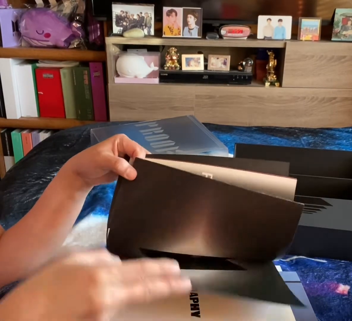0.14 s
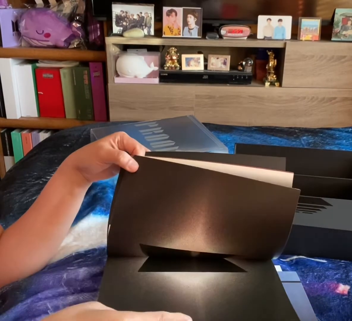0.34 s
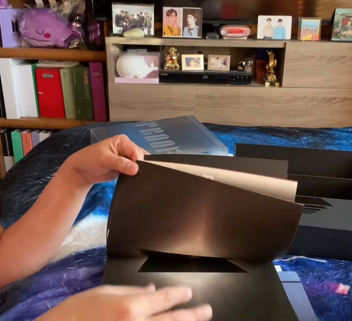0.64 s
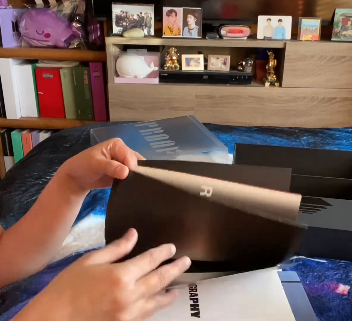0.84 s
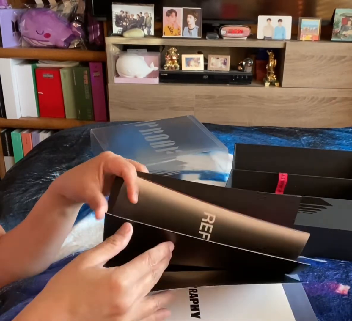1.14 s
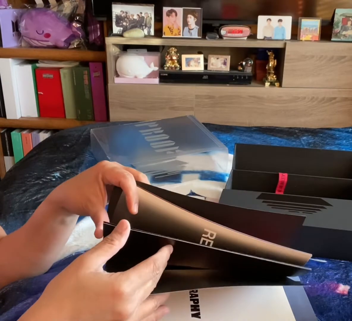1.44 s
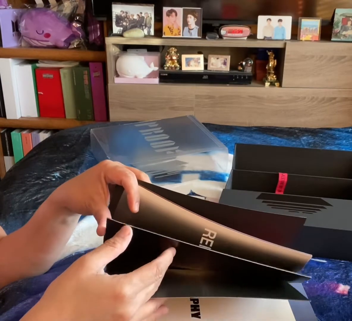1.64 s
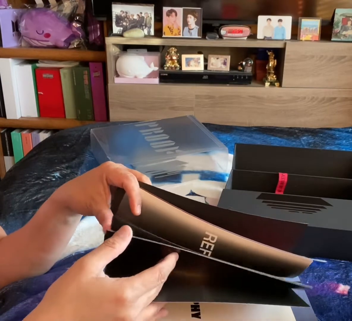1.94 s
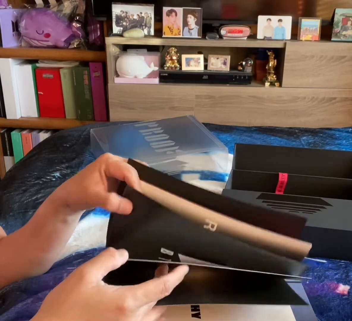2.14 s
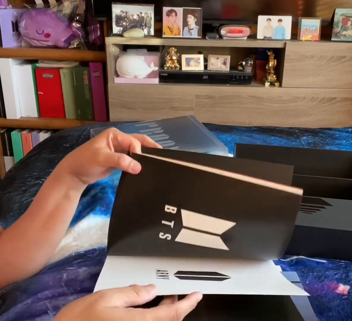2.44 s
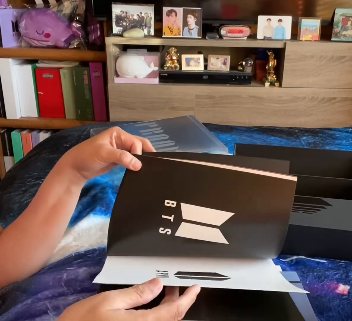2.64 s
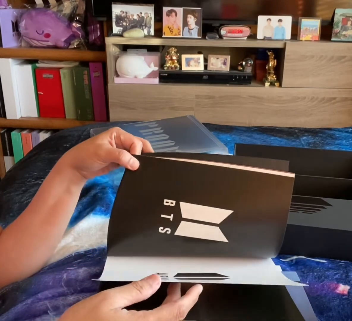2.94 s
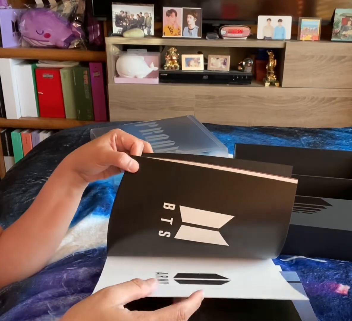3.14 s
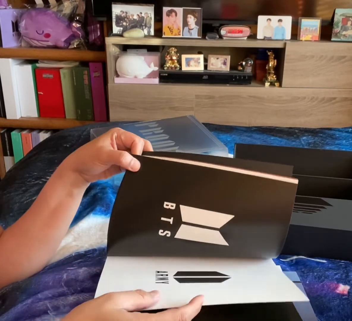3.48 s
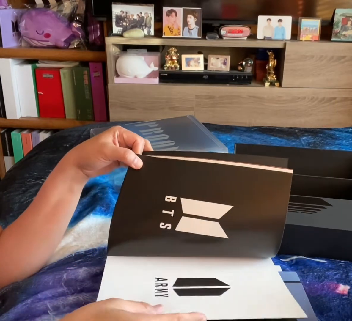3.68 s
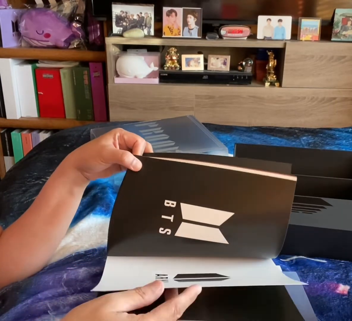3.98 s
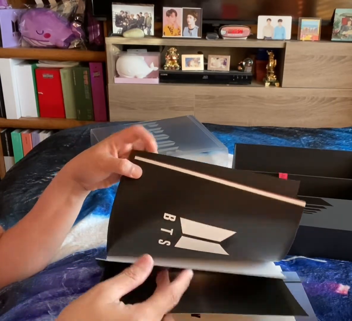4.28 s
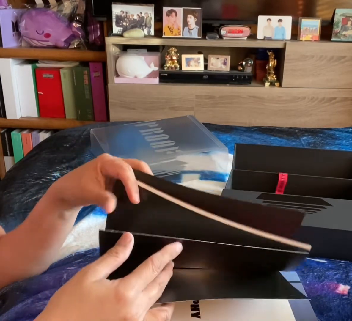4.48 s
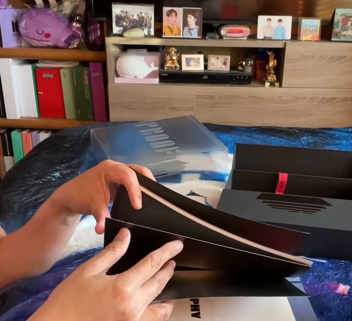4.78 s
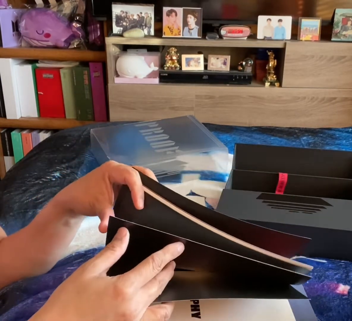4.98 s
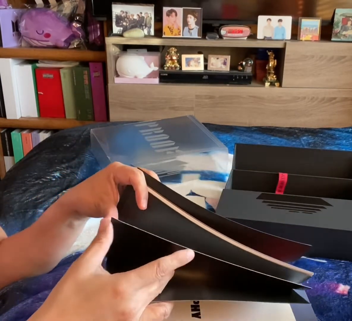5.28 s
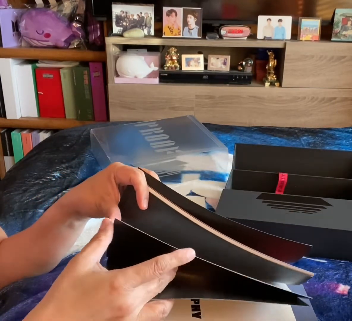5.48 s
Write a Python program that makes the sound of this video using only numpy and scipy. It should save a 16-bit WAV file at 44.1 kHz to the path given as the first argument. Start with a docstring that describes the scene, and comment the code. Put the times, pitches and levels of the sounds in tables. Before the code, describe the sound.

Stiff, coated booklet pages are handled close to the microphone in a small, quiet room with low rumble, faint hum and soft hiss. From 0 s, quick overlapping slides rasp and fizz, with gritty scuffs and short scraping resonances, growing brisker toward 0.9 s. At about 0.92 s a page edge flicks loose: a bright crack, a brief tightening ring, a low flap of air and a broad papery smack, by far the loudest moment. Rubbing continues to 2.7 s, with an extremely thin, broken whistle from 1.2 to 2.1 s. From 2.9 s fingertips tap softly, densest until 3.6 s, dry ticks over dull, padded knocks. A sharp scuff at 4.15 s begins another stretch of sliding until 4.6 s; then mostly faint creeping rustle and weak taps, with short rubs from 5.1 s to the end. A far bird gives faint falling chirps near 0, 2.4, 2.9, 3.3, 3.7, 4.7 and 5.2 s.

```python
"""A small, quiet room with a booklet close to the microphone: hum, hiss, a far bird's chirp.
Stiff pages slide, rub and scuff at once; at 0.9 s a bent sheet flicks loose, rings, flaps and smacks down.
A thin whistle wavers from 1.2 to 2.1 s; from 2.9 s fingertips tap as the rubbing and the chirps go on.
Paper is shaped noise under hand-speed envelopes; the snap, tapped stack, bird and whistle use sines."""
import sys
import numpy as np
from scipy import signal
from scipy.fft import rfft, irfft
from scipy.io import wavfile

SR = 44100
rng = np.random.default_rng(int(sys.argv[2]) if len(sys.argv) > 2 else 0)


def output_pcm(signal):
    """Save a mono or channel-first signal as 16-bit PCM at the path in sys.argv[1].

    Samples are clipped to [-1, 1] before scaling.
    """
    pcm = np.clip(np.atleast_2d(signal).T, -1, 1) * 32767
    wavfile.write(sys.argv[1], SR, np.round(pcm).astype(np.int16))


N = 247842
T, HZ = np.arange(N) / SR, np.fft.rfftfreq(N, 1 / SR)  # time [s], spectrum bins [Hz]


# Close paper: one sheet slides over another. Edge level is before the arch of the stroke:
# (start [s], end [s], edge rasp level [dB], sheet body re rasp [dB], coating fizz re rasp [dB])
SLIDE_STROKES = [(-.03, 0.16, -64.5, 0, -2), (0.146, 0.255, -66, 5, 3), (0.263, 0.403, -68, 6.5, -1),
                 (0.394, 0.558, -75.5, 11.5, 1), (0.508, 0.61, -64.5, -9, 1), (0.606, 0.78, -65.5, -3, -4),
                 (0.751, 0.865, -59, -7.5, -7.5), (0.843, 0.89, -54, -2, 0), (0.93, 1.06, -66.5, 7.5, -0.5),
                 (1.037, 1.122, -57, -1, -4.5), (1.106, 1.257, -67, 3.5, -2.5), (1.337, 1.46, -73, -2, -15),
                 (1.432, 1.579, -63, -4.5, -0.5), (1.59, 1.679, -67, -3.5, -0.5),
                 (1.907, 2.04, -58.5, -2, -3), (2.009, 2.108, -58.5, 4.5, -2), (2.073, 2.285, -62, -2, -4),
                 (2.25, 2.392, -62, 2, -2), (2.37, 2.486, -60.5, 1, -15), (2.497, 2.648, -72, -8, -7),
                 (2.576, 2.74, -71, 4.5, -9.5), (2.862, 3.087, -72, -4, -14.5),
                 (3.078, 3.21, -68.5, 2, -1.5), (3.43, 3.57, -71, 1, 2.5), (3.687, 3.932, -73, -19, -5.5),
                 (3.937, 4.093, -64, 0, -8.5), (4.068, 4.173, -58.5, -0.5, 1.5),
                 (4.172, 4.484, -60.5, -3.5, -8.5), (4.433, 4.613, -66.5, -6, -4.5),
                 (5.139, 5.235, -69, -1, -9), (5.188, 5.31, -63, -4, -5), (5.31, 5.396, -69, 0.5, -26),
                 (5.409, 5.569, -66.5, 0, -28)]
# Rustle of the hands on the binding: (time [s], level [dB])
HAND_LEVELS = [(0, -82), (.5, -81), (1.2, -69.5), (1.8, -74.5), (2.45, -65.5), (3.0, -71), (4.0, -69.5),
               (5.1, -70.5), (5.62, -69)]
# Colour of the sheet body: (frequency [Hz], level [dB])
SHEET_COLOUR = [(200, -20.5), (400, -3), (700, -1), (1000, 1.5), (1300, -3), (1750, -3), (2300, -9.5),
                (3500, -19), (7000, -55.5)]
# Colour of the rasping edge: (frequency [Hz], level [dB])
RASP_COLOUR = [(800, -25), (1700, -3), (2400, 2.5), (3500, 1.5), (4700, -2), (6000, -8.5), (8000, -8.5),
               (12000, -35)]
# Colour of the fizzing coating: (frequency [Hz], level [dB])
FIZZ_COLOUR = [(3000, -25.5), (5500, -2.5), (7500, -0.5), (9500, -1), (12000, -3.5), (13600, -4.5),
               (14800, -26), (16500, -30.5)]
# The hands keep the held sheets creeping: body re hand level [dB], edge level [dB]
CREEP_BODY_DB, CREEP_RASP_DB = -5, -84
# Fingers creep on the binding in fits and starts: depth [dB], rate [Hz]
FIDGET_DB, FIDGET_HZ = 2.5, 16
JUDDER_DB = 1.0  # how hard the uneven pull shakes the layers
CRACKLE_DB = -7.5  # snapping fibres against the rasp


def slide():
    """Fibres catch and let go as sheet slides on sheet; the uneven pull shakes all layers together."""
    power = 0
    for start, end, db, body, fizz_db in SLIDE_STROKES:
        layer_gains = amp([db + body, db, db + fizz_db])
        power = power + np.outer(layer_gains, stroke(start, end)) ** 2
    sheet_gain, rasp_gain, fizz_gain = np.sqrt(power)
    grip = amp(np.interp(T, *np.transpose(HAND_LEVELS)))

    creeping_sheet = np.hypot(sheet_gain, grip * amp(CREEP_BODY_DB))
    sheet = creeping_sheet * noise(SHEET_COLOUR, grain_db=2) * amp(1.0 * wander(60))
    rasp = np.hypot(rasp_gain, amp(CREEP_RASP_DB)) * noise(RASP_COLOUR, grain_db=2.5)
    rasp = rasp + rasp_gain * amp(CRACKLE_DB) * crackle()
    fizz = fizz_gain * noise(FIZZ_COLOUR, grain_db=1.5)

    hand_colour = [(120, -9.5), (220, -1.5), (420, 1.5), (700, 0.5), (1400, -12.5), (4000, -58.5)]  # Hz, dB
    hands = grip * noise(hand_colour, grain_db=3.0)
    fidget = unit(amp(FIDGET_DB * wander(FIDGET_HZ)))
    judder = amp(JUDDER_DB * wander(200))
    return flexing((sheet + rasp + fizz) * judder + hands * fidget)


ATTACK_S, RELEASE_S, ARCH_DB = 0.048, 0.024, 2.0


def stroke(start, end):
    """Speed of one slide: a smooth start, an arch while the hand pulls, a short run-out."""
    along = np.clip((T - start) / (end - start), 0, 1)
    attack = np.sin(np.pi / 2 * np.clip((T - start) / ATTACK_S, 0, 1)) ** 2
    release = np.exp(-np.clip((T - end) / RELEASE_S, 0, 60))
    arch = amp(ARCH_DB * (np.sin(np.pi * along) - 1.5))  # 1 dB down in the middle, 3 dB at the ends
    return attack * release * arch


# Colour of single fibres snapping under the sliding edge: (frequency [Hz], level [dB])
CRACKLE_COLOUR = [(400, -14.5), (1200, 2.5), (3000, 5), (6000, -1), (8500, -10.5), (13000, -14.5),
                  (15000, -39.5)]
CRACKLE_PER_S = 190  # mean number of clicks a second


def crackle(spread_db=5.0):
    """Snapping fibres give sparse tiny clicks of uneven size."""
    sign = rng.choice([-1., 1.], (2, N))
    hit = rng.random(N) < CRACKLE_PER_S / SR
    size = amp(spread_db * np.minimum(rng.exponential(1, N), 3))
    return unit(irfft(rfft(sign * hit * size) * amp(read(CRACKLE_COLOUR)), N))


FLEX_DB = 3.2  # how far the colour of a bending sheet shifts


def flexing(pair, across_hz=130, lasting=0.024):
    """The resonances of a bending sheet come and go, so its colour keeps shifting."""
    z = signal.stft(pair, nperseg=512, noverlap=384)[2]
    bins, frames = z.shape[1:]
    over_hz = np.exp(-(np.arange(-12, 13) * SR / 512 / across_hz) ** 2)
    over_time = np.exp(-(np.arange(-40, 41) * 128 / SR / lasting) ** 2)
    chance = rng.standard_normal((bins, frames))
    patches = unit(signal.fftconvolve(chance, np.outer(over_hz, over_time), "same"))
    return signal.istft(z * unit(amp(FLEX_DB * patches)), nperseg=512, noverlap=384)[1][:, :N]


# Close paper: a dragged edge makes one patch of the sheet ring:
# (time [s], level [dB], pitch [Hz], swell [s])
SCRAPE_EVENTS = [(.125, -56.5, 1710, 0.027), (.19, -61, 1200, .02), (.2, -64, 1900, .025),
                 (.25, -62, 1124, 0.026), (.32, -65, 1130, 0.044), (.33, -69, 2050, .03),
                 (.35, -74, 6560, 0.029), (.392, -66, 1760, 0.023), (.48, -64, 1060, .04),
                 (.55, -61, 950, 0.047), (.56, -64, 1200, 0.023), (.72, -67.5, 12100, .05),
                 (.733, -56.5, 3440, 0.016), (.735, -58, 1740, 0.014), (.833, -60, 1320, 0.046),
                 (.893, -56.5, 1744, .023), (1.075, -56, 1210, 0.023), (1.1, -61.5, 1850, .04),
                 (1.535, -65, 6500, 0.017), (1.944, -64, 1208, 0.024), (1.985, -60, 1210, 0.025),
                 (2.033, -57, 4500, 0.013), (2.058, -56.5, 1190, .018), (2.21, -61.5, 2140, .03),
                 (2.33, -63, 7400, .023), (2.33, -56, 960, 0.018), (2.437, -59, 3460, 0.023),
                 (2.46, -58, 1020, 0.042), (2.63, -66.5, 6470, 0.021), (2.69, -69.5, 6500, .023),
                 (3.16, -70, 12400, 0.017), (3.99, -65.5, 2750, 0.042), (4.125, -61, 6060, .023),
                 (4.16, -54.5, 1080, .02), (4.16, -58, 2950, .015), (4.228, -60.5, 3120, 0.051),
                 (4.29, -63, 4400, .04), (4.335, -66, 3250, .04), (4.35, -66, 1260, 0.036),
                 (4.385, -60, 2710, 0.053), (4.445, -65.5, 3920, .03), (5.225, -66, 3300, 0.027),
                 (5.28, -70.5, 6500, 0.029), (5.453, -58.5, 1425, .012), (5.535, -66.5, 3700, .04)]
SCRAPE_FADE = 0.5  # fade time as a share of the swell


def scrapes(width=0.1):
    """Friction noise in one narrow resonance, whose width is a share of its pitch."""
    drive = rfft(rng.standard_normal((2, N)))
    out = 0
    for s, db, hz, swell in SCRAPE_EVENTS:
        resonance = 1 + ((HZ / hz - 1) / width) ** 2
        ring = unit(irfft(drive / resonance, N))
        out = out + amp(db) * burst(s, swell, SCRAPE_FADE * swell) * ring
    return out


# Close paper: a page edge catches and slips: (time [s], level [dB], fade [s], brightness [dB/octave])
SCUFF_EVENTS = [(.114, -54.5, 0.023, 1), (0.245, -55, 0.0051, -3.5), (0.542, -58, 0.038, -5.5),
                (0.733, -57.5, 0.014, -1), (.889, -51.5, 0.034, -2), (1.542, -54, 0.0081, 0),
                (2.064, -54, 0.014, 2.5), (2.084, -54, .002, 0), (2.352, -58, 0.038, 5),
                (2.463, -57, 0.007, 0), (3.106, -55, 0.0081, 5), (4.147, -53.5, 0.0038, 7),
                (4.158, -44.5, 0.006, 4.5), (4.304, -57, 0.021, 5.5), (5.32, -57.5, 0.0028, 4),
                (5.444, -53.5, 0.017, 2)]
# Colour of a scuff, shared by the fingertip ticks and the landing: (frequency [Hz], level [dB])
SCUFF_COLOUR = [(150, -11), (500, 2.5), (1300, 2), (2200, -1), (4000, -3), (7000, -8.5), (10000, -20),
                (13000, -20), (16000, -34)]
SCUFF_RISE_S = 0.0025


def scuffs():
    """Short gritty slips of a page edge, each a burst of shaped noise."""
    out = 0
    for s, db, fade, tilt in SCUFF_EVENTS:
        out = out + amp(db) * burst(s, SCUFF_RISE_S, fade) * noise(SCUFF_COLOUR, tilt_db=tilt)
    return out


# Close fingertips on the booklet: (time [s], tick level [dB], dull knock level [dB])
TAP_EVENTS = [(2.876, -62, -57), (2.9011, -56.5, -52.5), (2.9593, -53, -51), (3.066, -60, -54.5),
              (3.099, -51, -50), (3.107, -56.5, -57), (3.187, -54, -54), (3.359, -65, -53.5),
              (3.392, -73, -59), (3.428, -61.5, -56), (3.511, -59, -55.5), (3.632, -74, -64),
              (3.881, -67.5, -55), (3.91, -65, -53.5), (4.134, -61, -54), (4.294, -60, -60),
              (4.456, -64, -57.5), (4.506, -66, -63), (4.538, -68, -56), (4.744, -76.5, -62.5),
              (4.775, -76, -61.5), (4.9, -73, -59.5), (5.084, -77.5, -64), (5.107, -74, -61.5),
              (5.192, -68, -58.5)]
# Colour of the padded thud: (frequency [Hz], level [dB])
THUD_COLOUR = [(50, -38.5), (110, -10), (220, 6), (400, 6), (720, 5.5), (1200, -4.5), (2500, -16),
               (5000, -31), (9000, -39)]
# Ring of the stack of pages, before detuning: (pitch [Hz], level re knock [dB], fade [s])
STACK_RING = [(182, -6, 0.015), (297, -6.5, 0.0042), (413, -9, 0.019), (570, -8.5, 0.0095),
              (740, -4.5, 0.01), (1000, -11.5, 0.00092)]


def taps(tick_tilt_db=0.5, thud_db=-1, thud_fade=0.0024, shuffle_db=-15, shuffle_fade=0.016):
    """A tap is a dry tick, a padded thud and the stack's ring, whose loose sheets shuffle briefly."""
    tick, thud = 0, 0
    for s, tick_db, knock_db in TAP_EVENTS:
        tick = tick + amp(tick_db) * burst(s, 0.00048, 0.0013)
        thud = thud + amp(knock_db + thud_db) * burst(s + 0.00032, 0.0008, thud_fade)
        thud = thud + amp(knock_db + shuffle_db) * burst(s + 0.0026, 0.002, shuffle_fade)

    knock, t = np.zeros(N), T[:SR // 8]
    # each tap falls on its own spot: chance polarity and detuning of every mode
    spots_of_taps = rng.uniform(-1, 1, (len(TAP_EVENTS), len(STACK_RING), 2))
    for (s, _, knock_db), spots in zip(TAP_EVENTS, spots_of_taps):
        ring = 0
        for (hz, level, fade), (side, detune) in zip(STACK_RING, spots):
            tone = np.sin(2 * np.pi * hz * (1 + 0.072 * detune) * t)
            ring = ring + np.sign(side) * amp(level) * np.exp(-t / fade) * tone
        knock[round(s * SR):][:len(t)] += amp(knock_db) * ring
    return tick * noise(SCUFF_COLOUR, tilt_db=tick_tilt_db) + thud * noise(THUD_COLOUR) + knock


# Colour of the page edge flicking off the finger: (frequency [Hz], level [dB])
CRACK_COLOUR = [(500, -1), (2200, -2), (3000, -3.5), (4800, -6), (5600, -8.5), (6800, -4), (7350, 3),
                (7650, 9), (8100, 1.5), (9000, -5), (11000, -10.5), (13000, -6.5), (14200, -20),
                (16500, -27)]
# Start [s], level [dB], hold [s], fade [s]
CRACK_S, CRACK_DB, CRACK_HOLD_S, CRACK_FADE_S = 0.9168, -28, 0.0018, 0.0013


def crack(tail_db=-21, tail_fade=0.024):
    """The page edge flicks off the finger just before the buckling; a thin sizzle trails it."""
    hold = (T > CRACK_S) * np.exp(-np.clip((T - CRACK_S - CRACK_HOLD_S) / CRACK_FADE_S, 0, 60))
    flick = np.maximum(burst(CRACK_S, 0.0004, CRACK_FADE_S), hold)
    sizzle = amp(tail_db) * burst(CRACK_S, 0.0004, tail_fade)
    return amp(CRACK_DB) * (flick + sizzle) * noise(CRACK_COLOUR)


# Ring of the flipping sheet, before the climb and the left/right trims: (pitch [Hz], level [dB])
SNAP_RING = [(195, -36), (345, -38), (600, -35.5), (790, -35.5), (1030, -26), (1175, -17.5), (1345, -26),
             (1455, -26), (1590, -26), (1665, -26.5), (1985, -36.5)]
# The belly flaps and pushes air, before the left/right trims:
# (middle time [s], peak level [dB], pitch [Hz], length [s])
BELLY_FLAPS = [(0.9371, -37, 334, 0.011), (.938, -40, 73.8, 0.063), (0.949, -28.5, 210, .012),
               (.957, -42.5, 180, .016)]
# The bent sheet snaps through: start, swell, hold, decay [s]
SNAP_S, SNAP_ATTACK_S, SNAP_HOLD_S, SNAP_FADE_S = 0.9177, 0.0016, 0.008, 0.003
SNAP_CLIMB_PER_S = 3  # the ring climbs as the sheet pulls taut: share of the pitch per second


def buckle():
    """The sheet flips through its bend, ringing briefly as it tightens, and its belly flaps."""
    age = T - SNAP_S
    swell = np.clip(age / SNAP_ATTACK_S, 0, 1)
    decay = np.exp(-np.clip((age - SNAP_ATTACK_S - SNAP_HOLD_S) / SNAP_FADE_S, 0, 60))
    # bent time axis: the listed pitches are reached one hold time after the start
    taut = age * (1 + SNAP_CLIMB_PER_S * (age / 2 - SNAP_HOLD_S))
    out = swell * decay * sum(amp(db) * np.sin(2 * np.pi * hz * taut) for hz, db in SNAP_RING)
    for s, db, hz, length in BELLY_FLAPS:
        near = abs(T - s) < length / 2
        t = T[near] - s
        out[near] += amp(db) * np.cos(np.pi * t / length) ** 2 * np.cos(2 * np.pi * hz * t)
    late = np.interp(T - 0.00005, T, out)  # the left side comes 0.05 ms later
    return np.array([late * amp(-2.0), out * amp(-2.4)])


# Broad papery colour of the sheet slapping onto the page below: (frequency [Hz], level [dB])
SMACK_COLOUR = [(120, -12.5), (300, -8), (480, -13), (750, -9), (1150, 3.5), (1620, 0), (2250, -8.5),
                (2750, -23.5), (5000, -28.5), (12000, -40)]


def smack(settle_db=-51, settle_fade=0.02):
    """Broad noise of the whole sheet as it flips over; it shivers roughly as it settles."""
    shiver = amp(settle_db) * burst(0.93, 0.012, settle_fade) * unit(amp(3.8 * wander(110)))
    slap = amp(-31) * burst(0.933, 0.0075, 0.016)
    return slap * noise(SMACK_COLOUR) + shiver * noise(SMACK_COLOUR, grain_db=4.0, tilt_db=0.5)


def landing(s=0.9405, db=-41.5, tilt_db=-4.0):
    """The flipped sheet skids to rest on the page below, a gritty burst of noise."""
    return amp(db) * burst(s, 0.0045, 0.014) * noise(SCUFF_COLOUR, tilt_db=tilt_db)


# Level of the thin whistle, before a 4 dB lift: (time [s], level [dB])
WHINE_LEVELS = [(1.18, -90), (1.27, -81), (1.35, -78), (1.375, -84), (1.41, -77), (1.46, -85), (1.51, -80),
                (1.62, -81), (1.675, -72), (1.735, -86), (1.785, -77), (1.825, -82), (1.86, -78),
                (1.895, -86), (1.94, -72), (2.05, -73), (2.12, -110)]
# Its partials: (pitch [Hz], relative level [dB])
WHINE_TONES = [(1990, -11), (2308, 0), (2620, -12)]
# Its pitch drifts slowly and trembles [Hz rms each]
WHINE_DRIFT_HZ, WHINE_TREMBLE_HZ = 12, 6


def whine(flutter_db=2):
    """A thin, faint whistle of sines that wavers and breaks up while the pages are held up."""
    drift = WHINE_DRIFT_HZ * wander(9)
    level = np.interp(T, *np.transpose(WHINE_LEVELS), left=-np.inf, right=-np.inf)
    tone = 0
    for hz, db in WHINE_TONES:
        gain = amp(level + db + flutter_db * np.tanh(wander(22)))
        pitch = hz + drift + WHINE_TREMBLE_HZ * wander(58)
        tone = tone + gain * np.sin(2 * np.pi * np.cumsum(pitch) / SR)
    return amp(4.0) * tone + amp(-5) * room(np.array([tone, tone]))


# A far bird, before pitch blur and mixing trims:
# (time [s], level [dB], first pitch [Hz], last pitch [Hz], length [s])
BIRD_CHIRPS = [(0.029, -60.5, 4580, 4090, 0.076), (2.372, -63.5, 4570, 3160, 0.083),
               (2.865, -71, 4850, 3550, 0.077), (3.297, -63.5, 4580, 3004, 0.073),
               (3.697, -62, 4610, 2940, 0.1), (4.699, -70.5, 4795, 3410, 0.084),
               (5.162, -68.5, 4580, 3146, 0.08)]
# The call comes back from the walls outside: (delay [s], level re call [dB])
WALL_ECHOES = [(.024, -9), (.047, -10), (.078, -13)]


def chirps(blur_hz=230, rough_db=2.0, bend=1.4):
    """Broken whistles that fall in pitch and flatten out, trailed by echoes."""
    out = np.zeros((2, N))
    for side in out:
        waver = blur_hz * wander(560)
        for s, db, top_hz, end_hz, length in BIRD_CHIRPS:
            on = (T > s) & (T < s + length)
            u = (T[on] - s) / length
            pitch = end_hz + (top_hz - end_hz) * (1 - u) ** bend + waver[on]
            turns = np.cumsum(pitch) / SR
            side[on] += amp(db) * np.sqrt(np.sin(np.pi * u).clip(0)) * np.sin(2 * np.pi * turns)
    out = out * unit(amp(rough_db * wander(90)))
    return out + echoes(out, WALL_ECHOES)


# Colour of the low room rumble: (frequency [Hz], level [dB])
RUMBLE_COLOUR = [(20, -30.5), (35, -10), (58, 0.5), (80, 1), (108, 5.5), (128, 2), (155, -11.5),
                 (195, -13.5), (230, -14.5), (265, -17), (320, -25), (400, -24.5), (480, -23), (800, -64.5)]
# Faint wavering hum tones: (pitch [Hz], level [dB])
HUM_TONES = [(107, -66), (192, -73), (260, -79.5), (398, -81)]
# Colour of the soft hiss: (frequency [Hz], level [dB])
HISS_COLOUR = [(150, -12), (400, 9.5), (700, -4), (1200, -4), (2400, -3), (4000, -17.5), (6000, -16.5),
               (9000, -30), (13000, -14.5), (16000, -43)]
# Likeness of left and right in the room sound: (frequency [Hz], likeness [0-1])
ROOM_LIKENESS = [(50, 1), (200, 0.62), (500, 0), (1500, 0.1), (8000, .3)]


def background(width_hz=9, rumble_db=-57.0, swell_db=0.3, hiss_db=-77.5):
    """Low lumpy rumble and wavering hum tones of narrow noise under a soft hiss."""
    swell = unit(amp(swell_db * wander(14)))
    drive = rfft(rng.standard_normal((2, N)))
    tones = 0
    for hz, db in HUM_TONES:
        tones = tones + amp(db) * unit(irfft(drive * np.exp(-((HZ - hz) / width_hz) ** 2), N))
    rumble = amp(rumble_db) * noise(RUMBLE_COLOUR) * swell
    hiss = amp(hiss_db) * noise(HISS_COLOUR)
    return left_right(rumble + tones + hiss, ROOM_LIKENESS)


# Decay of the small room: (frequency [Hz], time to fall 60 dB [s])
ROOM_DECAY = [(150, 0.24), (500, 0.21), (1300, 0.14), (3000, 0.19), (8000, 0.076), (15000, 0.14)]


def room(x, first=0.015):
    """Sparse reflections of random sign, each band dying at its own speed."""
    size = SR // 2
    sign = rng.choice([-1., 1.], (2, size))
    reflections = sign * (rng.random((2, size)) < 0.06) * (T[:size] > first)
    hz, t, z = signal.stft(reflections, SR, nperseg=256)
    decay = amp(-60 * t / read(ROOM_DECAY, hz)[:, None])
    tail = signal.istft(z * decay, SR, nperseg=256)[1]
    tail = tail / np.linalg.norm(tail, axis=1, keepdims=True)
    return signal.fftconvolve(x, tail, axes=1)[:, :N]


def echoes(x, table):
    """Single delayed copies of a sound, as from separate surfaces."""
    out = 0
    for delay, db in table:
        out = out + amp(db) * np.pad(x, ((0, 0), (round(delay * SR), 0)))[:, :N]
    return out


def left_right(pair, likeness, phase=0):
    """Spreads two unrelated signals over left and right, by likeness and phase in each band."""
    a, b = rfft(pair)
    same = np.clip(read(likeness), 0, 1)
    right = same * a + np.sqrt(1 - same ** 2) * b
    return irfft([a, right * np.exp(-1j * phase)], N)


def amp(db):
    """Decibels to gain."""
    return 10 ** (np.asarray(db) / 20)


def unit(x):
    """Scales to rms 1."""
    return x / np.sqrt(np.mean(x ** 2) + 1e-20)


def read(points, hz=HZ):
    """Reads a table on a log-frequency axis."""
    f, value = np.transpose(points)
    return np.interp(np.log(hz + 1), np.log(f + 1), value)


def noise(spectrum, grain_db=0, tilt_db=0):
    """Two unrelated coloured noises; uneven sample sizes make them gritty."""
    grain = amp(grain_db * np.minimum(rng.exponential(1, N), 6))
    drive = rng.standard_normal((2, N)) * grain
    colour = amp(read(spectrum) + tilt_db * np.log2(HZ / 3000 + 0.0194))  # tilt in dB/octave
    return unit(irfft(rfft(drive) * colour, N))


def wander(rate_hz):
    """Slow chance of rms 1, up to about the given rate."""
    return unit(irfft(rfft(rng.standard_normal(N)) * np.exp(-(HZ / rate_hz) ** 2), N))


def burst(s, rise, fade):
    """Envelope that swells up to the time s and dies away."""
    return np.exp(-np.minimum(np.where(T < s, ((T - s) / rise) ** 2, (T - s) / fade), 60))


# Likeness of left and right in the close paper: (frequency [Hz], likeness [0-1])
PAPER_LIKENESS = [(100, 0.92), (500, 0.8), (1400, 0.9), (2300, .7), (3300, 0.1), (6000, 0.3), (7700, 0.2),
                  (8600, 1), (15000, 0.99)]
# Phase between left and right of the close paper: (frequency [Hz], phase [radians])
PAPER_PHASE = [(100, 2), (700, -2.5), (1600, -0.86), (2500, -1.77), (4400, -1.7), (5300, -0.5), (6200, 2.5),
               (7400, 3), (8600, 2), (9500, 3), (11300, 6.5), (12900, 8), (14200, 7.5)]
# The snap comes back from nearby furniture: (delay [s], level re snap [dB])
FURNITURE_ECHOES = [(0.0131, -19.5), (0.0313, -20.5)]


def scene():
    """Near paper, the snap, the distant bird and the room around them."""
    rubbing = slide() + scrapes() + scuffs() + taps() + crack() + landing()
    paper = left_right(rubbing + amp(-9.0) * room(rubbing), PAPER_LIKENESS, read(PAPER_PHASE))
    snap, slap, call = buckle(), smack(), chirps()
    snap_in_room = room(amp(-19.5) * snap + amp(-11.5) * slap, first=0.011)
    snap_spread = left_right(slap + snap_in_room, ROOM_LIKENESS)
    bird = amp(-2.5) * call + amp(-2.0) * room(call, first=0.003)  # much of it arrives by way of the walls
    return paper + snap + echoes(snap, FURNITURE_ECHOES) + snap_spread + bird + whine() + background()


EDGE_HZ = 15750  # upper band limit


def record(dry):
    """A steep low-pass: nothing sounds above the upper band limit."""
    low_pass = signal.firwin(511, EDGE_HZ, window=("kaiser", 9), fs=SR)
    return signal.oaconvolve(dry, low_pass[None], "same")


dry = scene()
out = record(dry)
output_pcm(out)
```